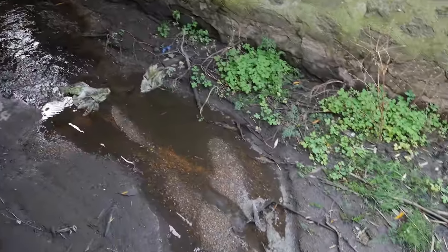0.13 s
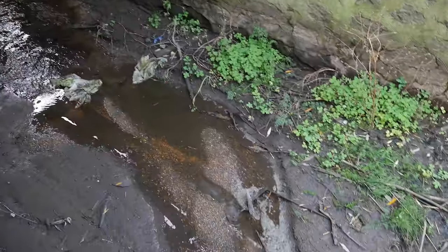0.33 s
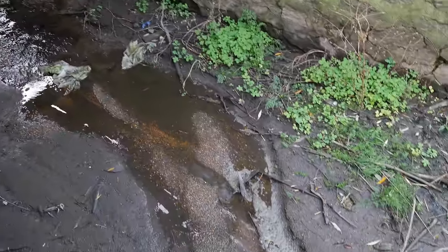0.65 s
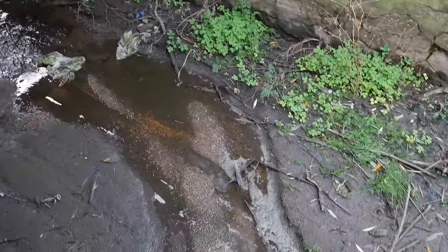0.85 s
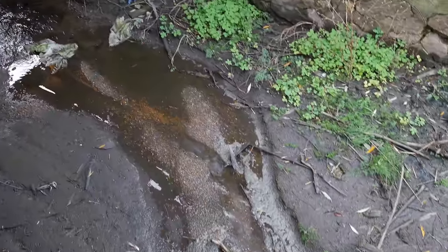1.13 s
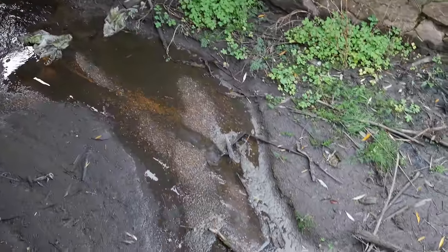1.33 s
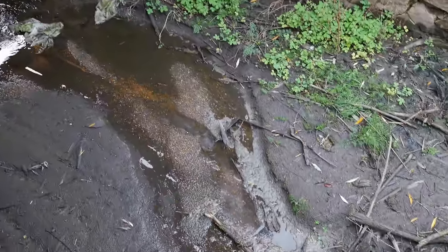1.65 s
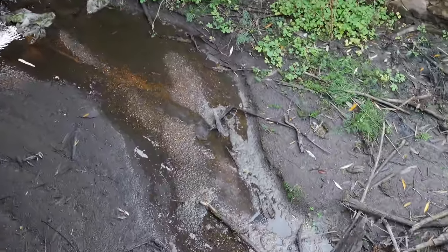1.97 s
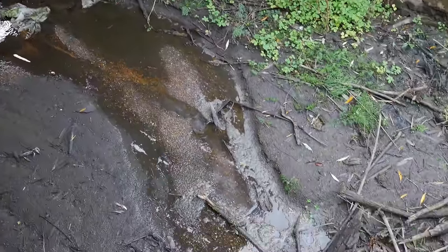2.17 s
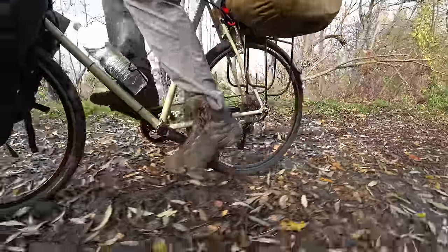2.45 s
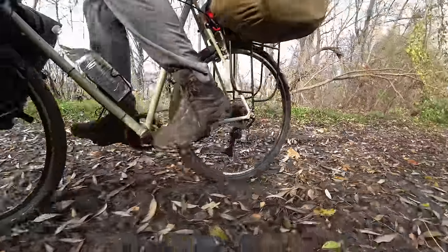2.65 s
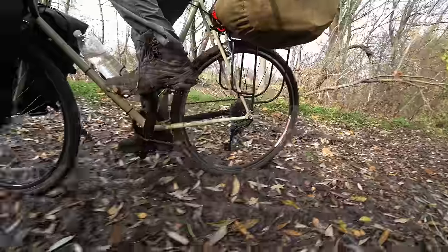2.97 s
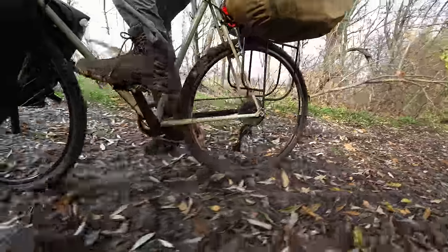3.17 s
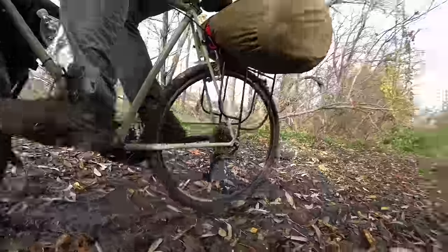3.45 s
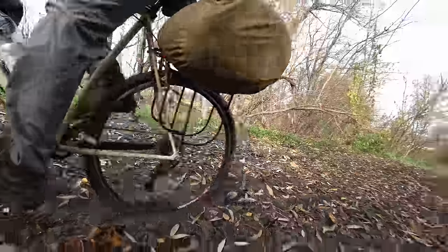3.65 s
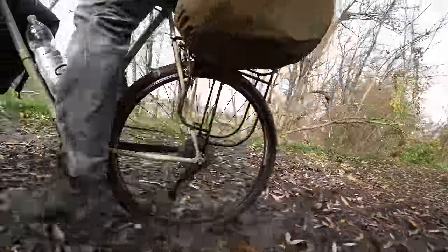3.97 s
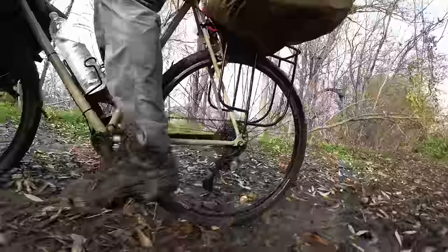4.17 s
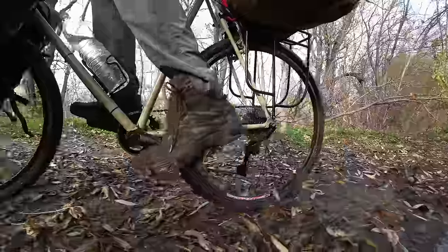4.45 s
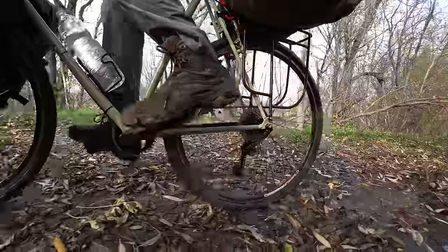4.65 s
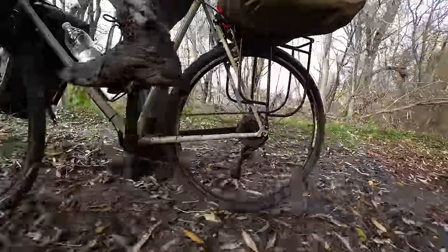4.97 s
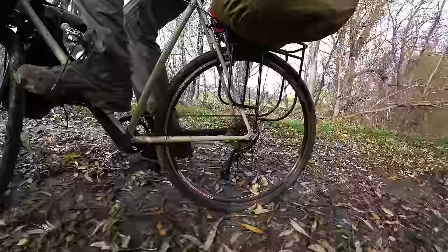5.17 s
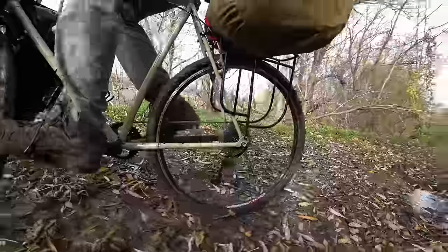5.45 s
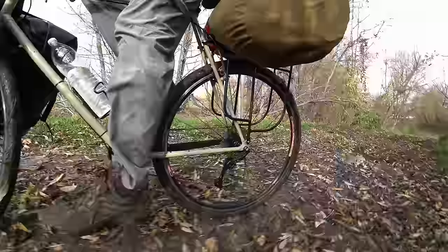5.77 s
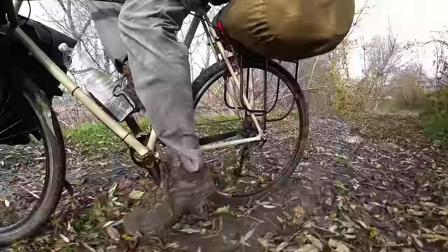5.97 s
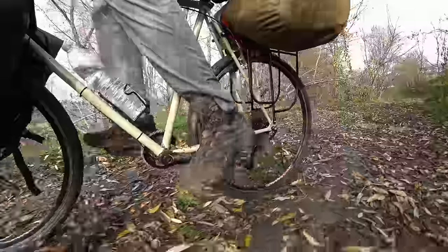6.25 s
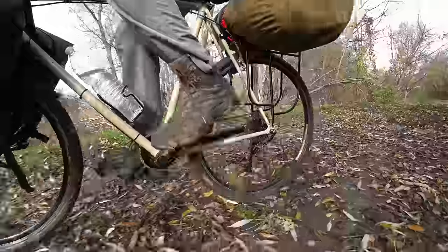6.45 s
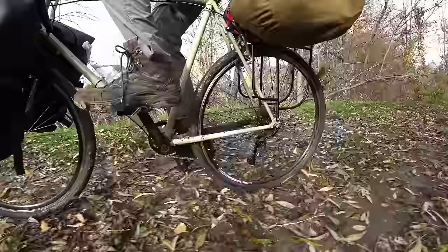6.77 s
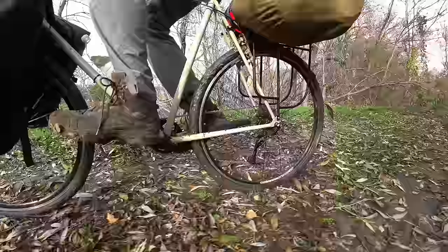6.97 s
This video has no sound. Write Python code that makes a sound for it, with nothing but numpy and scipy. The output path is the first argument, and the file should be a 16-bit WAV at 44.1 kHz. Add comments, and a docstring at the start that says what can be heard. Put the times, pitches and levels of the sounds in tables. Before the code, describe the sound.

Steady hissing water with faint birds and wind dies away; abruptly, close tyres crunch over damp leaves with snapping twigs, luggage knocks and wet pops.

```python
"""Stream by a weir, then a muddy ride

At first, a stream rushes over a low weir, wind rumbles on the microphone and birds call from the bank; all fade out.
Then, close to the wheels, a loaded bicycle rides a muddy path covered in dead leaves.
Water and leaves are swarms of tiny damped rings; wind is low noise, and bird calls are short noise bands.
Twigs and luggage are noise bursts in a damped mode, and wet mud pops as sines gliding upward.
"""
import sys
import numpy as np
from scipy import signal
from scipy.fft import rfft, irfft, next_fast_len
from scipy.io import wavfile
from scipy.ndimage import uniform_filter1d, map_coordinates

SR = 44100
rng = np.random.default_rng(int(sys.argv[2]) if len(sys.argv) > 2 else 0)


def digitize_waveform(pressure):
    """Quantize a signal to 16-bit integers and store it at the path in sys.argv[1].

    Rows of a 2-D input are taken as channels; values are limited to [-1, 1].
    """
    field = np.atleast_2d(pressure).T
    bounded = np.clip(field, -1, 1)
    quanta = np.round(bounded * 32767).astype(np.int16)
    wavfile.write(sys.argv[1], SR, quanta)


N = 313551  # samples

# In spectra and mode tables, levels are relative: the sound is scaled to rms 1 after shaping.
# rushing water: (frequency [Hz], level [dB per Hz])
WATER_SPECTRUM = [(41, -32), (70, -5), (238, -8), (320, -5.5), (564, -9), (646, -14.5), (723, -9),
                  (2050, -18.5), (3160, -16.5), (3460, -12), (5830, -16), (8000, -12.5), (9380, -21.5),
                  (13500, -23), (15800, -32)]
# wind rumble on the microphone: (frequency [Hz], level [dB per Hz])
WIND_SPECTRUM = [(8, -8), (14, 0), (22, 0), (31, -2), (41, -7.5), (51, -14.5), (63, -28), (100, -48),
                 (200, -120)]
# stereo width of stream and birds: (frequency [Hz], side against mid [dB])
BANK_WIDTH = [(60, -40), (120, -27), (240, -21), (480, -21.5), (950, -19.5), (1890, -22), (3770, -20.5),
              (7520, -17.5), (15000, -10)]
# stereo width of the path close by: (frequency [Hz], side against mid [dB])
TRACK_WIDTH = [(60, -15), (110, -14), (200, -15), (380, -13), (700, -8), (1290, -8.5), (2380, -12.5),
               (4400, -16), (8120, -5), (15000, -7)]
# the ground under the tyres, before layer offsets: (time [s], mud [dB], leaves [dB])
GROUND_LEVELS = [(2.44, -51, -39), (2.46, -51, -37.5), (2.75, -48.5, -36), (3.09, -45.5, -35.5),
                 (3.45, -48.5, -35.5), (3.61, -45.5, -33.5), (3.91, -46, -34), (3.98, -45.5, -35),
                 (4.15, -52.5, -39.5), (4.35, -57, -38.5), (4.61, -53, -38), (4.78, -52, -37),
                 (5.31, -50.5, -37.5), (5.84, -51, -37.5), (6.01, -52.5, -37.5), (6.44, -52.5, -36.5),
                 (6.59, -51, -34), (7.1, -50, -36.5)]
# tone of mud and leaves: (frequency [Hz], level [dB per Hz])
GROUND_SPECTRUM = [(24, -67), (40, -37.5), (353, -22), (500, -15), (950, -10.5), (1620, -8.5), (2300, -4),
                   (5260, 0), (8450, -6), (14700, -20), (15800, -19)]
# twigs and stalks breaking, before SNAP_GAIN_DB: (time [s], peak [dB], pitch [Hz], splintering against snap [dB])
TWIG_SNAPS = [(2.5588, -7.5, 7200, -20), (2.827, -18, 5770, -14), (2.9018, -19, 5640, -18),
              (3.1498, -20.5, 4270, -6), (3.3089, -18.5, 4960, -29), (3.467, -12.5, 5560, -5),
              (3.5149, -16.5, 2840, -4), (3.6194, -14.5, 6450, -15), (3.7518, -14.5, 4800, -13),
              (3.9058, -14, 3340, -18), (3.9447, -14.5, 5300, -3), (3.9687, -16, 6350, -17),
              (4.0067, -6, 5260, -10), (4.0144, -12.5, 7400, -13), (4.0413, -14, 7240, -14),
              (4.0596, -17.5, 3160, -16), (4.1739, -18, 7800, -14), (4.1975, -13.5, 6050, -15),
              (4.288, -19, 5630, -14), (4.3063, -20, 7550, -13), (4.357, -19, 8050, -1),
              (4.4035, -21, 5500, -12), (4.5615, -20, 5640, -26), (4.5958, -20.5, 6440, -10),
              (5.0754, -15.5, 6300, -14), (5.1764, -17.5, 5900, -28), (5.3253, -15, 5300, -2),
              (5.5912, -11, 3460, -26), (5.913, -14.5, 5530, -26), (6.439, -18, 7000, -6),
              (6.5236, -16.5, 5190, -7)]
# air pockets popping in wet mud, before POP_GAIN_DB: (time [s], level [dB], starting pitch [Hz], t60 [s])
MUD_POPS = [(2.852, -31, 1780, 0.071), (2.983, -27, 1195, 0.049), (3.266, -20, 1370, .022),
            (3.315, -26, 1380, 0.039), (3.912, -30.5, 630, 0.069), (3.946, -23, 704, 0.055),
            (3.965, -23, 764, 0.024), (3.995, -19, 860, 0.026), (4.012, -17.5, 1120, 0.023),
            (4.016, -17.5, 1357, 0.058), (4.028, -24.5, 1830, 0.036), (4.049, -22, 2000, .028),
            (4.066, -22, 1156, .031), (4.081, -30, 2270, 0.05), (4.103, -35, 1120, 0.067),
            (4.81, -31, 780, 0.038), (5.033, -24, 547, 0.024)]
# bumps shake frame and luggage: (time [s], knock peak [dB], pitch [Hz], thud before its envelope [dB])
LUGGAGE_KNOCKS = [(2.29, -32, 2480, -40.5), (2.517, -16, 1820, -44), (2.867, -21.5, 1920, -42.5),
                  (3.031, -25.5, 1510, -63), (3.131, -22.5, 1120, -47), (3.168, -24, 1640, -60),
                  (3.207, -16.5, 2380, -62), (3.2095, -17.5, 1110, -58), (3.472, -16.5, 2330, -67),
                  (3.494, -17.5, 2430, -64), (3.908, -13.5, 2970, -65), (3.946, -18.5, 1400, -36),
                  (4.124, -21, 2110, -38), (4.171, -27, 1770, -49), (4.402, -28, 1840, -51),
                  (4.809, -31, 696, -57), (5.033, -33, 560, -62), (5.324, -21, 1800, -64),
                  (5.359, -26, 1630, -58), (5.389, -24.5, 1620, -42), (6.19, -30.5, 1250, -66),
                  (6.394, -27.5, 2200, -44.5)]
# a bag rubbing on its rack: (middle [s], length [s], squeak [dB], low scuff [dB])
BAG_RUBS = [(4.866, 0.11, -40.5, -68), (5.39, 0.084, -42, -45)]
# ringing modes of the rack: (frequency [Hz], width [Hz], level [dB])
RACK_MODES = [(780, 70, -7.5), (1716, 110, .5), (2580, 84, -1), (3230, 70, 1), (3430, 70, -13)]
# low scuff of the bag: (frequency [Hz], level [dB per Hz])
SCUFF_SPECTRUM = [(50, -34), (120, -4), (400, 0), (1000, 7), (2000, -10), (5000, -50)]
# drifts of leaves flattened or swept aside: (start [s], length [s], level [dB], centre [Hz])
LEAF_SWISHES = [(2.304, 0.035, -35, 5570), (2.707, 0.027, -30.5, 5570), (2.803, 0.028, -34.5, 5970),
                (2.904, 0.056, -35.5, 5030), (3.374, 0.021, -30, 4900), (3.595, .05, -32.5, 6200),
                (3.824, 0.018, -30, 4000), (3.943, 0.02, -27, 4430), (4.174, 0.11, -32.5, 5650),
                (4.299, 0.063, -37.5, 5470), (4.651, .03, -32.5, 7400), (5.031, .13, -30, 5280),
                (5.255, 0.054, -32.5, 4800), (5.548, 0.057, -36.5, 4540), (5.886, 0.075, -28, 5150),
                (6.055, 0.018, -29.5, 4670), (6.127, 0.087, -38.5, 4300), (6.542, 0.061, -26, 4350),
                (6.609, .19, -31, 4550), (6.946, 0.064, -30.5, 5200), (7.051, 0.039, -30, 5500)]
# thud in the load: (frequency [Hz], level [dB per Hz])
THUD_SPECTRUM = [(50, -45), (140, -41), (300, -2), (500, 1), (900, -7), (2000, -47)]
# the water swells into a gurgle: (middle [s], length [s], level [dB], centre [Hz], width [Hz])
WATER_GURGLES = [(.704, .1, -56.5, 1240, 910), (1.324, .18, -61, 310, 45)]
# gusts on the microphone: (middle [s], length [s], level [dB])
WIND_GUSTS = [(0.097, .09, -41.5), (0.447, 0.82, -44.5), (0.813, 0.13, -40), (0.953, 0.29, -36.5),
              (1.19, 0.13, -38), (1.412, 0.13, -42), (1.758, 0.11, -35), (2.13, 0.17, -35.5)]
# far bird calls, bands before sharpening: (time [s], level [dB], centre [Hz], half width [Hz])
FAR_BIRDS = [(.029, -45, 4630, 695), (.105, -41, 3500, 260), (.248, -43, 3880, 800), (.38, -41, 4340, 900),
             (.43, -47, 2800, 250), (.999, -44, 4600, 700), (1.08, -44.5, 3500, 297),
             (1.43, -44, 2920, 450), (1.9, -44, 3950, 300)]
# harsh notes of a near bird: (time [s], level [dB], centre [Hz], half width before sharpening [Hz], t60 [s])
NEAR_BIRD = [(1.242, -44, 3600, 900, .17), (1.623, -30.5, 3140, 1020, 0.35),
             (1.625, -36.5, 4500, 800, 0.35), (1.71, -42.5, 6450, 3500, 0.21)]
# the weir throws up more spray: (middle [s], added level [dB])
SPRAY_SURGES = [(.05, 3), (.32, 4), (.7, 3), (1.09, 1.5), (2.11, 5.5)]
# a tyre pulls out of deep mud and small pops froth up, ever higher: (time [s], middle pitch [Hz])
FROTH_PITCH = [(3.93, 1090), (4.17, 2400)]
# left-right tilt of the leaves and tyre mud: (frequency [Hz], left gain [dB]); the right gets the opposite
LEFT_LEAN = [(380, 0.01), (1300, -0.65), (2400, -0.6), (4400, 0.79), (8100, 0.52), (15000, -0.84)]

RIDE_START = 2.289  # s
FADE_START = 1.36  # s; the bank fades in a straight line from here, to silence where the ride starts
TOP_HZ = 15900  # upper limit of the recorder
RUSH_DB, SPRAY_DB = -54.5, -52.5  # mean levels of the weir; the spray also surges
SURGE_S = 0.13  # length of a surge
BREEZE_DB = -44  # wind on the microphone between gusts
BIRD_RISE_S, BIRD_T60_S = 0.011, 0.21  # shared by all far calls
MUD_DB, CRUSH_DB, CRACKLE_DB = 1.5, -7, -2  # each layer against its ground level
DAMPNESS = 0.45  # dB more crushing of damp leaves for each dB more mud
STALK_DB, STALK_SPREAD_DB, STALK_HZ = 10, 0.5, 5400  # over the leaves and before SNAP_GAIN_DB; middle pitch
FROTH_DB, FROTH_T60_S = -29, .022  # mean level before POP_GAIN_DB
SNAP_GAIN_DB, POP_GAIN_DB = 2.5, -2.5
SNAP_TOP_HZ = 12800  # damp wood gives off little above this; knocks share the limit


def amp(db):
    """Decibels to gain."""
    return 10 ** (np.asarray(db) / 20)


def unit(x):
    """Scale to rms 1."""
    return x / np.sqrt(np.mean(x ** 2) + 1e-20)


def along(points, hz):
    """(frequency [Hz], value) points read on a log axis."""
    f, v = np.transpose(points)
    return np.interp(np.log(hz + 1), np.log(f + 1), v)


def curves(rows):
    """One value per sample for each column after the time."""
    s, *cols = np.transpose(rows)
    return [np.interp(np.arange(N) / SR, s, c) for c in cols]


def wobble(rate):
    """A smooth random curve, rate knots a second."""
    knots = rng.standard_normal(int(N * rate / SR) + 4)
    return map_coordinates(knots, [np.arange(N) * rate / SR])


def swell(s, length):
    """A bell-shaped envelope around time s, length seconds wide at 1/e."""
    return np.exp(-(2 * (np.arange(N) / SR - s) / length) ** 2)


def filtered(x, response):
    """x times a response of frequency."""
    n = x.shape[-1]
    m = next_fast_len(n + 8192)  # room for the filter to ring out
    return irfft(rfft(x, m) * response(np.fft.rfftfreq(m, 1 / SR)), m)[..., :n]


def noise(spectrum):
    """Coloured noise of rms 1."""
    return unit(filtered(rng.standard_normal(N), lambda hz: amp(along(spectrum, hz))))


def resonance(hz, centre, width):
    """Response of one damped mode."""
    return 1j * hz * width / (centre ** 2 - hz ** 2 + 1j * hz * width)


def add(track, s, sound):
    """Mix a sound into a track at time s."""
    part = track[..., round(s * SR):][..., :sound.shape[-1]]
    part += sound[..., :part.shape[-1]]


def stereo(pair, width):
    """A mid and a side signal to left and right."""
    side = filtered(pair[1], lambda hz: amp(along(width, hz)))
    return np.array([pair[0] + side, pair[0] - side])


def grains(lo_hz, hi_hz, cycles, spread_db, haze_db, count, size):
    """Mid and side of many tiny damped rings at random places, evened to a flat spectrum, with a noise haze."""
    when, pitch, strength, place = rng.random((count, 4)).T[:, :, None]
    turns = lo_hz * (hi_hz / lo_hz) ** pitch * np.arange(size) / SR
    heft = amp(spread_db * np.minimum(-np.log(1 - strength), 5))  # a few rings are much stronger
    age = turns / cycles
    rings = heft * np.sqrt(turns[:, 1:2] * age) * np.exp(-age) * np.sin(2 * np.pi * turns)
    rings = rings * np.cos(np.pi / 2 * np.arange(size) / size) ** 2  # even the lowest ring dies away smoothly
    index = ((when * N).astype(int) + np.arange(size)).ravel()
    pans = (1, np.sqrt(2) * np.cos(np.pi * place))  # mid, side
    pair = np.array([np.bincount(index, (rings * pan).ravel(), N)[:N] for pan in pans])
    z = rfft(pair, next_fast_len(N))
    power = np.abs(uniform_filter1d(np.abs(z[0]) ** 2, size=2001))
    flat = irfft(z / np.sqrt(power + 1e-12), next_fast_len(N))[:, :N]
    return unit(flat) + amp(haze_db) * rng.standard_normal((2, N))


def band(pair, spectrum, lo_hz, hi_hz):
    """One steep-sided band of a spectrum, at rms 1."""
    def response(hz):
        edges = 1 / np.sqrt((1 + (lo_hz / (hz + 1)) ** 10) * (1 + (hz / hi_hz) ** 10))
        return amp(along(spectrum, hz)) * edges
    return unit(filtered(pair, response))


def stream():
    """Countless small bubbles merge into a steady rush with restless spray; swarms of like size gurgle."""
    bubbles = grains(319, 19320, cycles=6.4, spread_db=1.7, haze_db=6.0, count=7000, size=600)
    rush = amp(RUSH_DB + 0.36 * wobble(7.9)) * band(bubbles, WATER_SPECTRUM, 60, 2060)
    surge_db = sum(db * swell(s, SURGE_S) for s, db in SPRAY_SURGES)
    spray_db = SPRAY_DB + surge_db + 1.3 * wobble(12.0)
    spray = amp(spray_db) * band(bubbles, WATER_SPECTRUM, 1900, 16000)
    gurgle = np.zeros((2, N))
    for s, length, db, centre, width in WATER_GURGLES:
        swarm = unit(filtered(bubbles, lambda hz: resonance(hz, centre, width) ** 2))
        gurgle += amp(db) * swell(s, length) * swarm
    return stereo(rush + spray + gurgle, BANK_WIDTH)


def wind():
    """Slow eddies press on both microphone ports alike, harder in each gust."""
    gust_power = sum((amp(db) * swell(s, length)) ** 2 for s, length, db in WIND_GUSTS)
    return np.sqrt(amp(BREEZE_DB) ** 2 + gust_power) * noise(WIND_SPECTRUM)


def birds(near_rise_s=0.00063):
    """Short harsh calls, smeared into a fading band by the rocky bank; the near one starts abruptly."""
    out, t = np.zeros((2, N)), np.arange(SR // 3) / SR
    far = [(*row, BIRD_T60_S, BIRD_RISE_S) for row in FAR_BIRDS]
    near = [(*row, near_rise_s) for row in NEAR_BIRD]
    for s, db, centre, width, t60, rise in far + near:
        hiss = rng.standard_normal((2, len(t)))
        rasp = unit(filtered(hiss, lambda hz: resonance(hz, centre, 2 * width) ** 3))
        add(out, s, amp(db - 60 * t / t60) * (1 - np.exp(-t / rise)) * rasp)
    return stereo(out, BANK_WIDTH)


def crack(pitch, sharpness, burst_s, tail_db, tail_s, lead_db, pan):
    """A strain, a sudden release 10 ms in and brief splintering ring a damped mode; peak 1 before panning."""
    t = np.arange(SR // 15) / SR - .01
    after = np.exp(-np.abs(t) / burst_s) + amp(tail_db) * np.exp(-np.abs(t) / tail_s)
    before = amp(lead_db) * np.exp(-np.abs(t) / 0.0022)
    push = rng.standard_normal(len(t)) * np.where(t < 0, before, after)

    def body(hz):
        """A small damp body radiates little far below or far above its mode."""
        mode = resonance(hz, pitch, pitch / sharpness) * resonance(hz, pitch, 1.9 * pitch)
        return mode / (1 + (hz / SNAP_TOP_HZ) ** 4)
    ring = filtered(push, body)
    return ring / np.abs(ring).max() * np.array([[1 + pan], [1 - pan]])


def luggage(thud_s=0.007):
    """Bumps knock the frame and thud in the load; twice a bag scrapes along the rack and rings its rods."""
    out, age = np.zeros((2, N)), np.arange(SR // 10) / SR
    soft = noise(THUD_SPECTRUM)
    thud_shape = age / thud_s * np.exp(1 - 2 * age / thud_s)  # strongest, at one half, after thud_s / 2
    for s, db, pitch, thud_db in LUGGAGE_KNOCKS:
        knock = crack(pitch, sharpness=0.82, burst_s=0.0016, tail_db=-11.5, tail_s=0.0094,
                      lead_db=-15.0, pan=0.31 * rng.standard_normal())
        add(out, s - .009, amp(db) * knock)
        add(out, s, amp(thud_db) * thud_shape * soft[round(s * SR):][:len(age)])

    def rods(hz):
        return sum(amp(db) * resonance(hz, f, w) for f, w, db in RACK_MODES)
    squeak = unit(filtered(rng.standard_normal(N), rods))
    scuff = noise(SCUFF_SPECTRUM)
    for s, length, squeak_db, scuff_db in BAG_RUBS:
        out += swell(s, length) * (amp(squeak_db) * squeak + amp(scuff_db) * scuff)
    return out


def froth(count):
    """Rows like those of MUD_POPS for small pops scattered around a rising pitch."""
    span, pitch = np.transpose(FROTH_PITCH)
    times = rng.uniform(*span, count)
    return [(s, FROTH_DB + 2.5 * a, np.interp(s, span, pitch) * np.exp(.3 * b), FROTH_T60_S)
            for s, (a, b) in zip(times, rng.standard_normal((count, 2)))]


def squelch(rise=1.57, attack_s=0.001):
    """Each air pocket rings as it opens, its pitch creeping upward."""
    out, t = np.zeros(N), np.arange(SR // 10) / SR
    for s, db, pitch, t60 in MUD_POPS + froth(count=14):
        envelope = amp(db + POP_GAIN_DB - 60 * t / t60) * (1 - np.exp(-t / attack_s))
        add(out, s, envelope * np.sin(2 * np.pi * pitch * t * (1 + rise * t)))
    return out


def stalks(count):
    """Rows like those of TWIG_SNAPS: small stalks at random moments, louder where the leaves are louder."""
    times = rng.uniform(RIDE_START, N / SR, count)
    path_s, _, leaves_db = np.transpose(GROUND_LEVELS)
    rows = []
    for s, (a, b) in zip(times, rng.standard_normal((count, 2))):
        db = np.interp(s, path_s, leaves_db) + STALK_DB + STALK_SPREAD_DB * a
        rows.append((s, db, STALK_HZ * np.exp(0.19 * b), -17))
    return rows


def twigs():
    """Twigs and leaf stalks snap under the wheels, each a sharp release with a splintering tail."""
    out = np.zeros((2, N))
    for s, db, pitch, splinter_db in TWIG_SNAPS + stalks(count=22):
        snap = crack(pitch, sharpness=4.4, burst_s=0.00024, tail_db=splinter_db, tail_s=0.0043,
                     lead_db=-15.5, pan=0.1 + 0.27 * rng.standard_normal())
        add(out, s - .009, amp(db + SNAP_GAIN_DB) * snap)
    return out


def leafy(pair, patchy_db):
    """Each leaf colours its own crackle for a moment: random gain in small patches of time and pitch."""
    z = signal.stft(pair, nperseg=512)[2]
    field = uniform_filter1d(rng.standard_normal(z.shape[1:]), size=6, axis=0)  # across pitch
    field = uniform_filter1d(field, size=4, axis=1)  # across time
    return signal.istft(z * amp(patchy_db * unit(field)), nperseg=512)[1][:, :N]


def swishes(edge_s=0.013, breadth=0.55):
    """A drift of leaves gives way in a dense burst of crackle that starts and stops quickly."""
    t = np.arange(N) / SR
    crunch = grains(1050, 14000, cycles=1.3, spread_db=3.0, haze_db=-3, count=24000, size=90)
    crunch = leafy(crunch, patchy_db=2.0)
    out = np.zeros((2, N))
    for s, length, db, centre in LEAF_SWISHES:
        near = (t > s - .1) & (t < s + length + .1)
        opening = (1 + np.tanh((t[near] - s) / edge_s)) / 2
        closing = (1 - np.tanh((t[near] - s - length) / (2 * edge_s))) / 2
        colour = lambda hz: np.abs(resonance(hz, centre, breadth * centre)) ** 1.21
        out[:, near] += amp(db) * opening * closing * unit(filtered(crunch[:, near], colour))
    return stereo(out, TRACK_WIDTH)


def tyres():
    """The tread presses mud, crushes damp leaves and breaks dry ones, clump by clump; more mud, more crushing."""
    mud_db, leaves_db = curves(GROUND_LEVELS)
    crush_db = leaves_db + CRUSH_DB + DAMPNESS * (mud_db - mud_db.mean())
    clumps_db = .5 * wobble(13) + 0.44 * wobble(45) + 1.47 * wobble(220)
    mud = grains(297, 2500, cycles=1.4, spread_db=3.0, haze_db=-0.5, count=6000, size=400)
    mud = leafy(band(mud, GROUND_SPECTRUM, 30, 1904), patchy_db=1.8)
    crush = grains(1680, 5350, cycles=3.2, spread_db=3.0, haze_db=-1.5, count=9000, size=160)
    crush = band(crush, GROUND_SPECTRUM, 2110, 4600)
    crackle = grains(3930, 17300, cycles=1.4, spread_db=4.0, haze_db=1, count=16000, size=70)
    crackle = band(crackle, GROUND_SPECTRUM, 4870, 23000)
    leaves = leafy(amp(crush_db) * crush + amp(leaves_db + CRACKLE_DB) * crackle, patchy_db=2.0)
    pressed_mud = amp(mud_db + MUD_DB + 0.82 * wobble(40)) * mud
    return stereo(amp(clumps_db) * (pressed_mud + leaves), TRACK_WIDTH)


def scene():
    """The bank fades out, then at once comes the ride, its upper crackle a little stronger on the left."""
    t = np.arange(N) / SR
    fade = np.clip((RIDE_START - t) / (RIDE_START - FADE_START), 0, 1)
    left_right = np.array([[1], [-1]])
    ground = filtered(tyres() + swishes(), lambda hz: amp(along(LEFT_LEAN, hz) * left_right))
    ride = ground + twigs() + luggage() + squelch()
    bank = fade * (stream() + wind() + birds())
    return np.where(t >= RIDE_START, ride, bank)


def record(dry):
    """The recorder keeps almost nothing above its band limit."""
    return filtered(dry, lambda hz: 1 / (1 + (hz / TOP_HZ) ** 200))


dry = scene()
out = record(dry)
digitize_waveform(out)
```